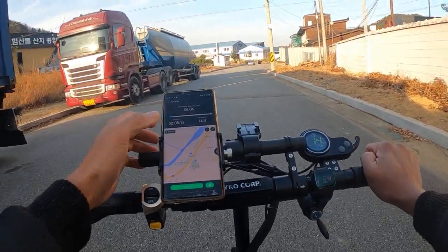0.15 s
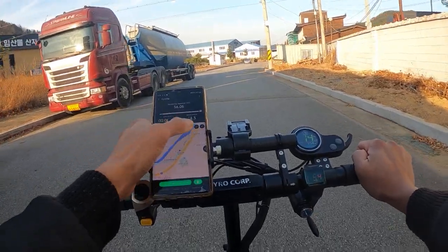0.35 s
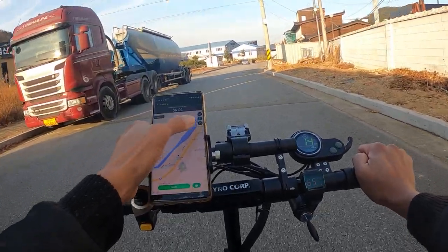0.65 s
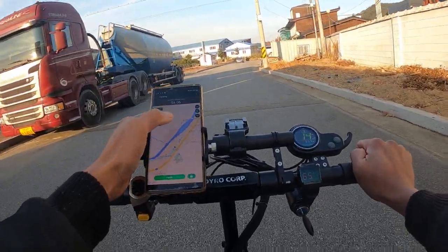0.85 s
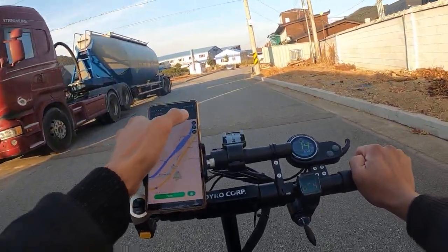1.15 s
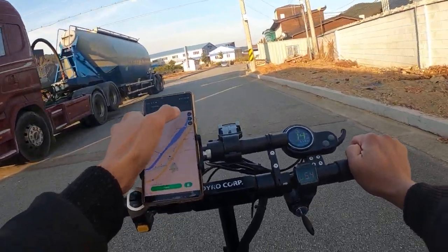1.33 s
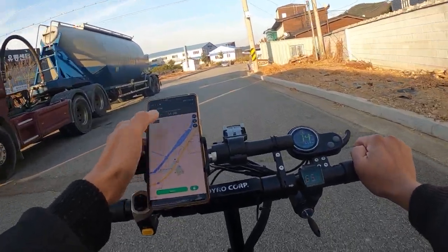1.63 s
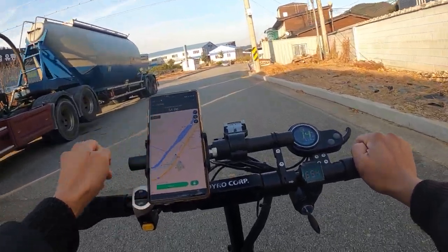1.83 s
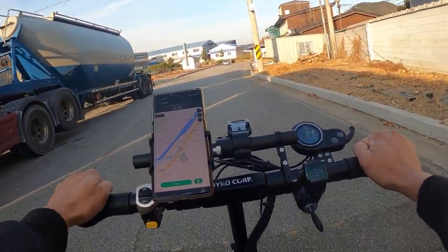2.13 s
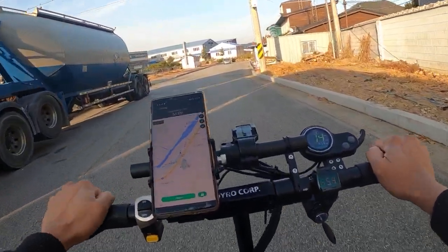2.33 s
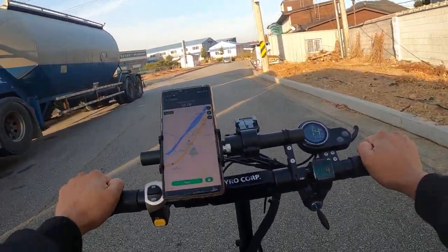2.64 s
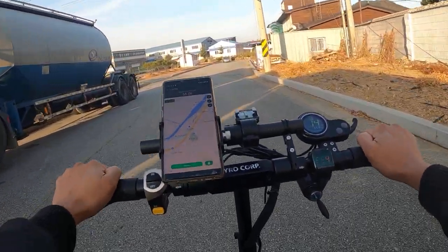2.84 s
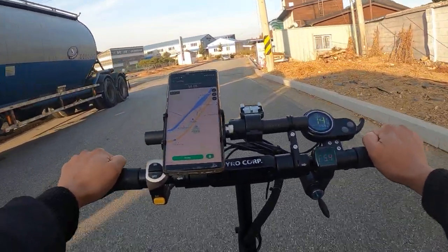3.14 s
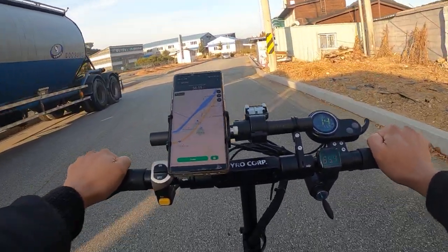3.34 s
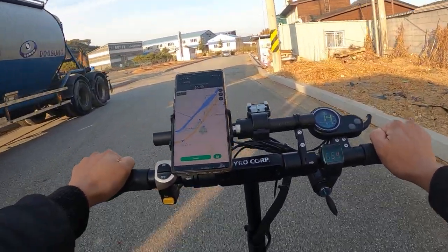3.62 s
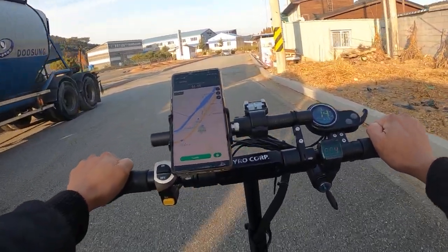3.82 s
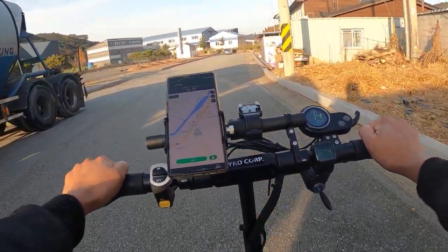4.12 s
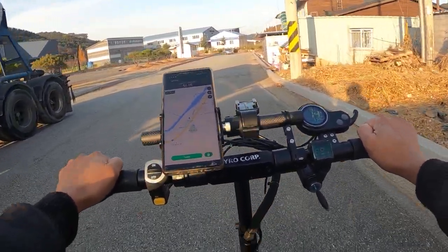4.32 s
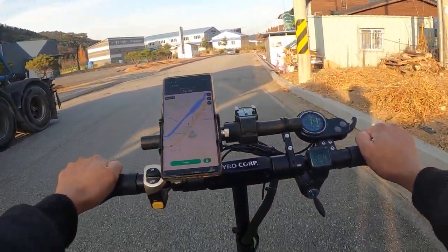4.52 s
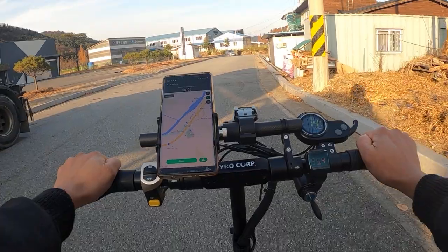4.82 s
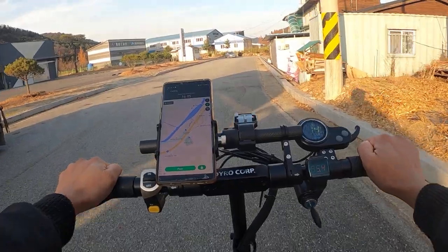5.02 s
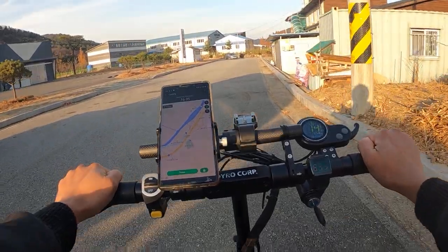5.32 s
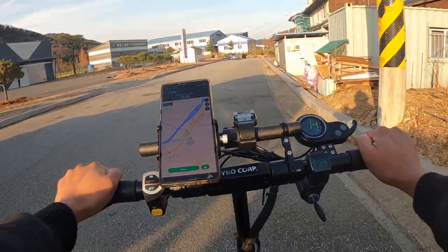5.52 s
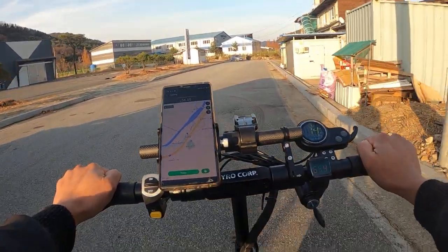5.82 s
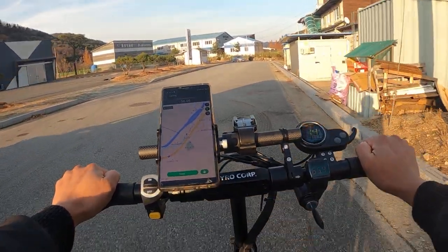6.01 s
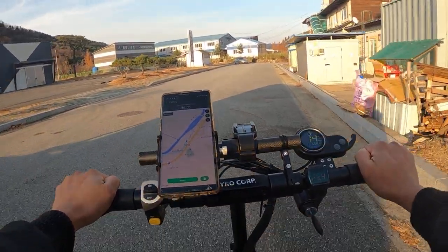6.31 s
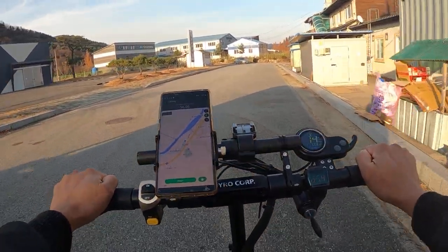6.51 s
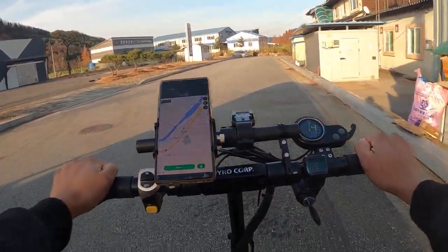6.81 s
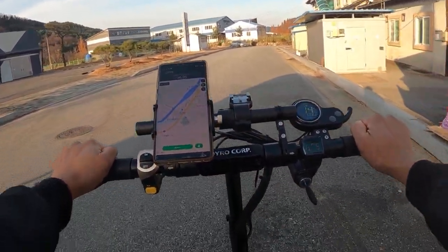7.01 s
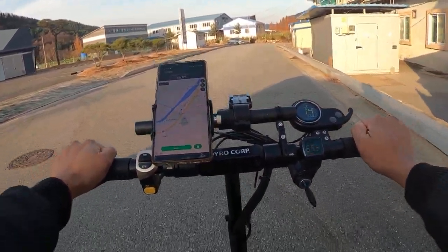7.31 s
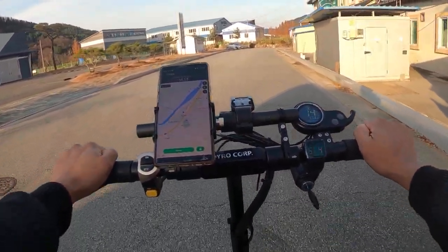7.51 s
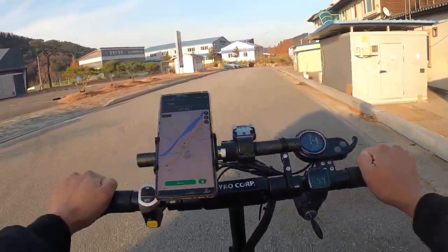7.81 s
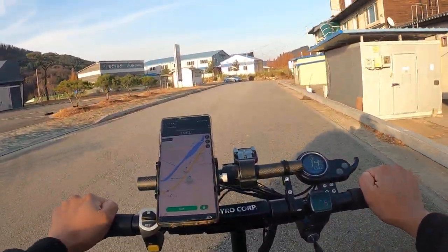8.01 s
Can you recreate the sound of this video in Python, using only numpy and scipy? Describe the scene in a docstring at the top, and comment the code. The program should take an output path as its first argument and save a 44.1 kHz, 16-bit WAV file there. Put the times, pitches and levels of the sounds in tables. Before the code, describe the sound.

Riding an electric scooter outdoors: low two-note motor hum-whine, rolling tyre noise, loose fittings ticking, one sharp rattling jolt, then dull thumps on the microphone.

```python
"""The hub motor of an electric scooter whines on two close notes, as heard from the rider's chest.
The tyres roar and hiss on asphalt (filtered noise), and loose fittings tick (chatter ringing the bar).
A rough patch makes the frame clatter and knock (struck modes, noise) and a dry joint squeak (harmonics).
Wind rumbles; bumps and buffets thump on the microphone and knock in the steering stem."""
import sys
import numpy as np
from scipy import signal
from scipy.io import wavfile

SR = 44100
rng = np.random.default_rng(int(sys.argv[2]) if len(sys.argv) > 2 else 0)


def wrap_up_sound(samples):
    """Save the sound to the file named by the first command line argument, as 16-bit audio."""
    columns = np.atleast_2d(samples).T
    # keep every value between -1 and 1, then stretch to whole-number steps
    tamed = np.clip(columns, -1, 1)
    steps = np.round(tamed * 32767).astype(np.int16)
    wavfile.write(sys.argv[1], SR, steps)


N = 359415
TIME = np.arange(N) / SR

# Motor speed, wavering as bumps check the wheel and it recovers.
# Each row: time in seconds, electrical rate in Hz.
MOTOR_SPEED = [(0, 74.8), (.2, 74.5), (.45, 75.2), (.74, 74.2), (.88, 75.7), (1.08, 74.5), (1.36, 75.5),
               (1.6, 74.5), (1.86, 75.5), (2.28, 74.7), (2.38, 74), (2.6, 74.6), (2.8, 73), (3.0, 73.4),
               (3.13, 74.3), (3.38, 73.9), (3.75, 74), (4.06, 74.8), (4.22, 73.8), (4.44, 75.5),
               (4.61, 73.8), (4.86, 75.5), (5.01, 74.4), (5.4, 75), (5.5, 75.9), (5.75, 75.1), (5.92, 75.9),
               (6.25, 75.5), (6.65, 76.7), (7.02, 77), (7.27, 76.3), (7.38, 75.1), (7.55, 77.2),
               (7.8, 76.3), (8.15, 76)]
SPEED_WOBBLE_HZ, WOBBLE_RATE_HZ = 0.08, 8
# Whine strength. Each row: time in seconds, fifth order in relative dB, sixth order in relative dB.
WHINE_LEVELS = [(0, -38.5, -41.5), (.8, -38.5, -45.5), (1.3, -40, -46), (2.3, -37, -41.5),
                (2.48, -37.5, -43.5), (2.66, -41, -33.5), (2.82, -35, -39), (3.1, -32, -43.5),
                (3.55, -33.5, -35.5), (4.4, -38.5, -45), (4.7, -38.5, -42), (5.3, -39, -42.5),
                (6.3, -38, -48), (7.05, -47, -45), (7.38, -33.5, -36.5), (7.55, -38, -44.5),
                (8.15, -40, -39.5)]
# Faint overtones of the whine. Each row: order, level in dB relative to the fifth-order curve.
WHINE_OVERTONES = [(9, -23), (12, -29), (14, -24.5), (25, -37.5)]

# Road coarseness, as tyre noise. Each row: time in seconds, level in dB.
ROAD_COARSENESS = [(0.0, -47), (0.34, -46), (0.95, -48.5), (2.38, -48.5), (2.72, -37), (2.87, -42),
                   (4.58, -48.5), (6.86, -48), (7.6, -43.5), (8.15, -42.5)]
# Tyre roar spectrum. Each row: frequency in Hz, relative band level in dB.
ROAR_SPECTRUM = [(150, -11.5), (250, 5), (420, -4.5), (600, -9.5), (1000, -7), (1400, -19), (1900, -10),
                 (2500, -20), (3200, -30.5), (5000, -44)]
# Tread hiss spectrum. Each row: frequency in Hz, relative band level in dB.
HISS_SPECTRUM = [(2000, -4.5), (3500, 11.5), (5500, -5), (7500, -0.5), (10000, -15.5), (12000, -25),
                 (15500, -35)]
# Hollow resonances of tyre and deck. Each row: centre in Hz, width in Hz, relative level in dB.
HOLLOW_RESONANCES = [(358.2, 31, 2), (502.3, 54, 0), (720, 109, -8), (1007, 238, -6), (1610, 150, -14),
                     (2060, 450, -24.5), (3280, 970, -29.5)]
ROAR_DB, HOLLOWS_DB, HISS_DB = 3.5, 0, -20.5  # relative to the road level
TYRE_EDGE_HZ = 2250
GRIT_DB, GRIT_S, GRIT_HALF_S = -49, 2.645, 0.086  # loose grit hissing on the rough patch

# Airflow. Each row: time in seconds, rumble in relative dB.
AIRFLOW = [(0, -38), (1.5, -43.5), (2.4, -38.5), (3.45, -39), (5.1, -38), (6.3, -45.5), (7.1, -37),
           (8.15, -33)]
# Wind rumble spectrum. Each row: frequency in Hz, relative band level in dB.
RUMBLE_SPECTRUM = [(15, 1), (40, -0.5), (80, -6), (150, -10), (250, -19), (400, -33.5)]

# Ticks of loose fittings. Each row: snap time in seconds, relative level in dB, upper edge in Hz.
FITTING_TICKS = [(0.018, -34.5, 17000), (0.055, -44, 6000), (0.078, -33, 17000), (0.157, -32.5, 17000),
                 (0.3006, -31.5, 17000), (0.3564, -38.5, 15000), (0.439, -30, 16000), (0.488, -42, 7000),
                 (0.501, -46, 9000), (0.527, -47, 7000), (0.5837, -22, 17000), (0.822, -45, 8050),
                 (0.941, -38.5, 12000), (0.993, -44, 15100), (1.324, -41, 17000), (1.3493, -47, 13000),
                 (1.389, -43, 13100), (1.8136, -43, 6500), (1.857, -38.5, 10000), (1.913, -25, 17000),
                 (1.997, -44, 7000), (2.046, -30, 14000), (2.305, -44, 7000), (2.3857, -27.5, 13000),
                 (2.4098, -29.5, 13000), (4.171, -32.5, 8400), (4.444, -46.5, 11000), (5.1936, -49, 5030),
                 (5.445, -48.5, 7000), (5.672, -48, 8050), (6.8775, -49, 8000), (6.975, -38, 9000),
                 (7.1286, -36.5, 9000), (7.2437, -37.5, 8000), (7.413, -38, 7500), (7.461, -32.5, 8400),
                 (7.953, -33.5, 7000), (7.988, -42, 8000), (8.0228, -44, 8000)]
SLIDE_LEAD_S, SLIDE_DB = 0.013, -14.5  # slide before the snap
SETTLE_DELAY_S, SETTLE_DB = 0.02, -13.5  # second chatter after the snap
BUZZ_DECAY_S, BUZZ_DB = 0.048, -9.5  # faint dying buzz
SNAP_CRACK_DB = -8  # bare crack added to the bar's sound
FAINT_TICKS_PER_S, FAINT_TICK_DB, FAINT_SPREAD_DB = 1.2, -56, 3
SOFT_EDGE_HZ, SOFT_EDGE_AT_DB, EDGE_DB_PER_OCTAVE = 5600, -40, 26.5  # softer contacts are duller
# Modes of the handlebar and its fittings. Each row: frequency in Hz, relative level in dB.
BAR_MODES = [(1200, -2), (1700, -3.5), (2820, 4), (3310, 5.5), (3700, 6), (3920, 4), (4370, -15.5),
             (4750, -11), (5110, 0), (5400, -7), (5770, -7), (6230, -0.5), (6780, -18.5), (7660, -13.5),
             (8130, -0.5), (9050, -2.5), (10100, -9.5), (11000, -19), (12400, -12)]
BAR_T60_S, BAR_STEP_SAMPLES = 0.017, 9

# Low thumps on the microphone. Each row: time in seconds, relative level in dB, half length in
# seconds, upper edge of the flutter in Hz, boom of the mount in dB relative to the flutter.
MIC_THUMPS = [(0.108, -26.5, 0.0089, 200, 2), (0.711, -22.5, 0.019, 232, -2),
              (0.825, -23.5, 0.016, 109, -12), (0.972, -17, 0.013, 172, 5.5),
              (1.235, -28.5, 0.0062, 70, -25), (1.772, -25.5, 0.018, 99, -25),
              (2.677, -13, 0.042, 190, -12), (2.755, -21.5, 0.015, 280, -8), (2.81, -13.5, 0.0053, 276, -6),
              (2.959, -16.5, 0.0058, 297, 2.5), (3.055, -20.5, 0.027, 110, -21), (3.7, -24, 0.058, 99, -13),
              (3.865, -17, 0.01, 62, -25), (4.102, -12, 0.012, 100, -9.5), (4.32, -20.5, 0.015, 89, -19),
              (4.503, -17, 0.016, 87, -30), (4.636, -12.5, 0.019, 116, -16), (4.764, -19, 0.0067, 137, -17),
              (4.924, -13, 0.017, 133, -3), (5.373, -17, 0.031, 144, -6.5), (5.442, -16, 0.011, 160, 0),
              (5.521, -18, 0.0085, 136, -17), (5.893, -15.5, 0.017, 144, -9.5),
              (6.023, -13.5, 0.012, 134, -5), (6.069, -17, 0.005, 162, -8), (6.679, -26.5, 0.041, 86, -7),
              (6.986, -11, 0.0071, 149, -10), (7.294, -15.5, 0.011, 111, -10), (7.364, -21, 0.027, 170, -9),
              (7.69, -24.5, 0.036, 140, -11), (7.773, -15.5, 0.02, 137, -14.5),
              (7.832, -18, 0.0097, 187, -6), (8.085, -13.5, 0.028, 141, -12.5)]
# The mount's boom band: lower and upper edge in Hz.
MOUNT_BAND_HZ = [125, 206]
REBOUND_DELAY_S, REBOUND_DB, REBOUND_STRETCH = 0.033, -9.5, 2.42
SMALL_THUMPS_PER_S, SMALL_THUMP_DB = 2.5, 7  # dB relative to the airflow curve
SMALL_THUMP_HALF_S, SMALL_THUMP_EDGE_HZ = 0.0089, 91

# Hard bumps. Each row: time in seconds, strength in relative dB.
STEM_BUMPS = [(0.104, -32), (0.693, -21), (0.96, -17), (2.628, -17), (2.801, -15), (2.96, -13), (4.095, -7),
              (4.643, -16), (4.933, -21.5), (5.438, -16), (6.98, -19), (7.295, -7), (7.828, -22)]
# Modes of the steering stem. Each row: frequency in Hz, relative level in dB, t60 in seconds.
STEERING_STEM_MODES = [(139, -3, 0.026), (295.4, -0.5, 0.033), (389, -3.5, 0.03), (636, -14, 0.022)]

# Frame knocks. Each row: time in seconds, bright ring of the bar in relative dB,
# dull clack of the deck in relative dB.
FRAME_KNOCKS = [(2.393, -50, -21), (2.4784, -22, -27), (2.497, -36, -44), (2.528, -34, -24),
                (2.552, -33, -21.5), (2.57, -26, -29), (2.5755, -30, -38), (2.5927, -15.5, -17),
                (2.6125, -28, -32), (2.6295, -18, -24), (2.6358, -15, -20), (2.648, -38, -21),
                (2.661, -20, -27), (2.673, -30, -32), (2.6801, -39, -26), (2.693, -26, -34),
                (2.696, -33, -19.5), (2.711, -18, -28), (2.7708, -10.5, -22), (2.778, -19, -28),
                (2.787, -23, -33.5), (2.808, -29, -16), (2.845, -20.5, -41), (2.9235, -15, -17),
                (2.927, -30, -16.5), (2.949, -27, -21), (2.9615, -20.5, -19), (2.9934, -26, -31),
                (3.0307, -24.5, -31), (6.271, -47, -25.5), (6.3619, -33, -37)]
# Clatter spectrum of deck and mudguard. Each row: frequency in Hz, relative band level in dB.
CLATTER_SPECTRUM = [(200, 7.5), (320, 4), (500, -1.5), (640, -7.5), (950, 13.5), (1500, -15), (2400, -26.5),
                    (3700, -36), (5200, -29.5), (9000, -49.5), (15000, -66.5)]
# Jolts on the rough patch. Each row: time in seconds, clatter in relative dB, rise in seconds,
# fall in seconds.
ROUGH_JOLTS = [(2.42, -45.5, 0.025, 0.017), (2.655, -34, 0.048, 0.071), (2.804, -35.5, 0.019, 0.0089),
               (2.93, -34.5, 0.019, 0.046)]
# Modes of deck and mudguard. Each row: frequency in Hz, relative level in dB, t60 in seconds.
DECK_MODES = [(520, -2, .04), (950, -1, .028), (1450, -6, .01), (1950, -8, .013), (2830, -3, .02),
              (3470, -1, .012), (3950, -5, .014), (4280, -9, .018), (6200, -12, .004)]
DECK_RING_DB, RATTLE_DB = -22, -7
RATTLES_PER_S, RATTLE_SPREAD_DB = 260, 6.5

# Squeaks of a dry joint. Each row: time in seconds, fundamental level in dB, half length in seconds,
# pitch in Hz, glide as a share of pitch per half length, slope in dB per harmonic.
JOINT_SQUEAKS = [(2.7432, -20.5, 0.0037, 965, 0.0034, -3), (2.8103, -14, 0.0015, 3330, -0.014, -24),
                 (2.816, -24, 0.001, 3080, 0.02, -21), (2.809, -38.5, 0.01, 3310, -0.004, -4.5)]

CUTOFF_HZ = 15800


def from_db(db):
    """Decibels to gain."""
    return 10 ** (np.asarray(db) / 20)


def rms_one(x):
    """Scale to unit rms."""
    return x / np.sqrt(np.mean(x ** 2) + 1e-20)


def in_time(rows):
    """Interpolate each column of a curve at every sample."""
    s, *columns = np.transpose(rows)
    return [np.interp(TIME, s, column) for column in columns]


def butter(x, edge_hz, kind, order=2):
    """Causal Butterworth filter."""
    edge_hz = np.clip(edge_hz, 10, 0.45 * SR)
    sos = signal.butter(order, edge_hz, kind, fs=SR, output="sos")
    return signal.sosfilt(sos, x + 1e-18)


def noise_band(low_hz, high_hz):
    """Band of noise at unit rms."""
    return rms_one(butter(rng.standard_normal(N), [low_hz, high_hz], "band"))


def drift(rate_hz):
    """Smooth random wander of spread 1: two-pole filtered noise, one value per 40 samples."""
    r = np.exp(-80 * np.pi * rate_hz / SR)
    noise = rng.standard_normal(N // 40 + 2002)
    slow = signal.lfilter([1], [1, -2 * r, r * r], noise)[2000:]
    return np.interp(np.arange(N) / 40, np.arange(len(slow)), rms_one(slow))


def bell(s, half_s):
    """Gaussian swell around time s."""
    return np.exp(-0.5 * np.minimum(((TIME - s) / half_s) ** 2, 100))


def coloured(spectrum, patchy_db, grain_db=0):
    """Noise in half-octave bands, each flickering on its own; uneven grain crackles; rms 1."""
    hz, level_db = np.transpose(spectrum)
    edges_hz = 15 * 2 ** np.arange(0, 10.1, 0.5)
    grain = from_db(grain_db * np.minimum(drift(170), 2))
    white = rng.standard_normal((2, N)) * grain
    out = 0
    for k, (low, high) in enumerate(zip(edges_hz, edges_hz[1:])):
        log_centre = np.log(low * high) / 2
        band_db = np.interp(log_centre, np.log(hz), level_db, left=-np.inf, right=-np.inf)
        if np.isfinite(band_db):
            band = butter(white[k % 2], [low, high], "band")  # neighbours use separate noises
            out = out + from_db(band_db + patchy_db * drift(18)) * band
    return rms_one(out)


def at_random(per_s):
    """Event times scattered evenly over the ride."""
    return rng.uniform(0, TIME[-1] - 0.25, 100)[:round(per_s * N / SR)]


def ring(force, hz, t60_s):
    """A mode: a unit click leaves a sine decaying from height 1."""
    r = from_db(-60 / (t60_s * SR))
    w = 2 * np.pi * hz / SR
    return signal.lfilter([0, np.sin(w)], [1, -2 * r * np.cos(w), r * r], force + 1e-18)


def ring_modes(force, modes):
    """Sum of modes struck together, with alternating sign."""
    return sum((-1) ** k * from_db(db) * ring(force, hz, t60_s)
               for k, (hz, db, t60_s) in enumerate(modes))


def contacts(rows, decay_s, rise_s=0.0018):
    """Each contact is a short, dying chatter of tiny impacts of very uneven size."""
    age_s = np.arange(SR // 5) / SR
    shape = (1 - np.exp(-(age_s / rise_s) ** 2)) * np.exp(-age_s / decay_s)
    force = np.zeros(N + len(age_s))
    draws = rng.standard_normal((len(rows), 2, len(age_s)))
    for (s, level_db, edge_hz), (chatter, size) in zip(rows, draws):
        burst = chatter * from_db(5 * size) * shape
        burst = butter(burst / np.linalg.norm(burst), edge_hz, "low")
        force[max(round(s * SR), 0):][:len(age_s)] += from_db(level_db) * burst
    return force[:N]


def by_force(s, level_db):
    """Contact rows whose upper edge rises with strength."""
    edge_hz = SOFT_EDGE_HZ * 2 ** ((level_db - SOFT_EDGE_AT_DB) / EDGE_DB_PER_OCTAVE)
    return np.c_[s, level_db, edge_hz]


def handlebar(force, top_hz, ring_db=-21):
    """Well damped bar modes, reached one after another, plus the contact's broad crack."""
    rings = np.zeros(N)
    for k, (hz, db) in enumerate(BAR_MODES):
        delayed = np.pad(force, (BAR_STEP_SAMPLES * k, 0))[:N]
        rings += from_db(db) * ring(delayed, hz, BAR_T60_S)
    crack = butter(force, [900, 6500], "band", order=1)
    return butter(from_db(ring_db) * rings + from_db(8) * crack, top_hz, "low", order=3)


def motor():
    """Torque ripple sings at five and six times the electrical rate; the road shakes each line."""
    rate_hz, = in_time(MOTOR_SPEED)
    fifth_db, sixth_db = in_time(WHINE_LEVELS)
    wobble_hz = SPEED_WOBBLE_HZ * drift(WOBBLE_RATE_HZ)
    angle = 2 * np.pi * np.cumsum(rate_hz + wobble_hz) / SR

    def line(order, flutter):
        in_phase = (1 + flutter * drift(18)) * np.sin(order * angle)
        return in_phase + flutter * drift(24) * np.cos(order * angle)

    fifth = from_db(fifth_db + 4.0) * line(order=5, flutter=0.22)
    seventh = from_db(-15.5) * line(order=7, flutter=0.24)  # follows the sixth-order level
    sixth_gain = from_db(sixth_db + 4.5 + 0.37 * drift(5))
    sixth = sixth_gain * (line(order=6, flutter=0.26) + seventh)
    # the fundamental swells as the motor pulls after the bump
    hum = from_db(-33.5) * bell(3.275, 0.15) * line(order=1, flutter=0.15)
    overtones = sum(from_db(fifth_db + 1.0 + db) * line(order, flutter=0.68)
                    for order, db in WHINE_OVERTONES)
    return fifth + sixth + hum + overtones


def tyres():
    """Asphalt grain drives a broad roar, the hollows of tyre and deck, and a fine hiss."""
    road_db, = in_time(ROAD_COARSENESS)
    hollows = sum(from_db(db) * noise_band(hz - width_hz / 2, hz + width_hz / 2)
                  for hz, width_hz, db in HOLLOW_RESONANCES)
    roar = butter(coloured(ROAR_SPECTRUM, patchy_db=2.0), TYRE_EDGE_HZ, "low", order=8)
    low = from_db(ROAR_DB) * roar + from_db(HOLLOWS_DB) * hollows
    grit_gain = from_db(GRIT_DB) * bell(GRIT_S, GRIT_HALF_S)
    hiss_gain = from_db(road_db + HISS_DB) + grit_gain
    return from_db(road_db) * low + hiss_gain * coloured(HISS_SPECTRUM, patchy_db=2.0)


def wind():
    """A lumpy rumble of air on the microphone: low noise of wandering level."""
    air_db, = in_time(AIRFLOW)
    gain = from_db(air_db + 2.0 + 1.3 * drift(11.0))
    return gain * coloured(RUMBLE_SPECTRUM, patchy_db=1.0)


def ticks():
    """A loose fitting slides, snaps on the bar and settles in softer chatter; faint ones at random."""
    s, level_db, edge_hz = np.transpose(FITTING_TICKS)
    slide_rows = np.c_[s - SLIDE_LEAD_S, level_db + SLIDE_DB, edge_hz]
    slide = contacts(slide_rows, decay_s=0.02, rise_s=0.022)
    snap = contacts(FITTING_TICKS, decay_s=0.002, rise_s=0.0012)
    settle_rows = np.c_[s + SETTLE_DELAY_S, level_db + SETTLE_DB, edge_hz]
    settle = contacts(settle_rows, decay_s=0.005, rise_s=0.0026)
    buzz = contacts(np.c_[s, level_db + BUZZ_DB, edge_hz], decay_s=BUZZ_DECAY_S)

    faint_s = at_random(FAINT_TICKS_PER_S)
    faint_db = rng.normal(FAINT_TICK_DB, FAINT_SPREAD_DB, len(faint_s))
    faint = contacts(by_force(faint_s, faint_db), decay_s=0.0028)

    soft = butter(slide + settle + buzz, 2800, "high", order=1)
    bar = handlebar(snap + faint + soft, top_hz=9500, ring_db=-22)
    crack = from_db(SNAP_CRACK_DB) * butter(snap, [1000, 11000], "band")
    low_body = from_db(23.5) * butter(snap, [950, 1900], "band")
    high_body = from_db(-6.5) * butter(snap, [3400, 6500], "band")
    return from_db(8.0) * (bar + crack) + low_body + high_body


def thump(level_db, half_s, top_hz, boom_db):
    """A slow pressure push with low flutter and the mount's boom, centred in half a second."""
    t = np.arange(-SR // 4, SR // 4) / SR
    swell = np.exp(-0.5 * (t / half_s) ** 2)
    flutter = butter(rng.standard_normal(len(t)), top_hz, "low", order=3)
    flutter = butter(flutter, top_hz * 0.22, "high", order=1) * swell
    boom = butter(rng.standard_normal(len(t)), MOUNT_BAND_HZ, "band") * swell
    noise = rms_one(flutter) + from_db(boom_db) * rms_one(boom)
    squared = (t / (0.44 * half_s)) ** 2
    push = (1 - squared) * np.exp(-0.5 * squared)
    push *= min(1.1, 110 / top_hz)  # dull thumps are mostly push
    return from_db(level_db - 4.0) * (noise * np.sqrt(np.mean(swell ** 2)) + push)


def thumps():
    """Bumps and buffets shake the microphone and rebound duller; random small ones follow the air."""
    rebounds = [(s + REBOUND_DELAY_S, db + REBOUND_DB, half_s * REBOUND_STRETCH, hz * 0.74, -np.inf)
                for s, db, half_s, hz, _ in MIC_THUMPS]
    small = []
    for s in at_random(SMALL_THUMPS_PER_S):
        level_db = np.interp(s, *np.transpose(AIRFLOW)) + SMALL_THUMP_DB
        small.append((s, level_db, SMALL_THUMP_HALF_S, SMALL_THUMP_EDGE_HZ, -np.inf))
    out = np.zeros(N + SR)
    for s, *shape in list(MIC_THUMPS) + rebounds + small:
        sound = thump(*shape)
        out[round(s * SR):][:len(sound)] += sound
    return out[SR // 4:][:N]  # thump centres land on their times


def stem():
    """A hard bump sends one firm knock up the steering stem: a click rings its modes."""
    force = np.zeros(N)
    for s, db in STEM_BUMPS:
        force[round(s * SR)] = from_db(db)
    return ring_modes(force, STEERING_STEM_MODES)


def shaking():
    """Each jolt builds up and dies away exponentially."""
    gain = np.zeros(N)
    for s, db, rise_s, fall_s in ROUGH_JOLTS:
        distance = np.maximum((s - TIME) / rise_s, (TIME - s) / fall_s)
        gain += from_db(db) * np.exp(-np.minimum(distance, 40))
    return gain


def rattle():
    """Separate small impacts of uneven size set deck and mudguard ringing; rms 1."""
    struck = rng.random(N) < RATTLES_PER_S / SR
    sizes = from_db(RATTLE_SPREAD_DB * np.minimum(rng.standard_normal(N), 1.8))
    signs = rng.choice([-1, 1], N)
    return rms_one(ring_modes(struck * sizes * signs, DECK_MODES))


def frame():
    """Bar and deck knock over bumps; on the rough patch deck and mudguard rattle and boom."""
    crackle = from_db(-3.0) * coloured(CLATTER_SPECTRUM, patchy_db=1.5, grain_db=6.5)
    boom = from_db(0.5) * noise_band(470, 550)  # hollow deck
    clatter = from_db(5.0) * shaking() * (crackle + boom + from_db(RATTLE_DB) * rattle())

    s, bar_db, deck_db = np.transpose(FRAME_KNOCKS)
    blows = contacts(by_force(s, bar_db), decay_s=0.0015, rise_s=0.0008)
    dull_bar = from_db(-0.5) * handlebar(blows, top_hz=4400)
    bright_bar = from_db(-9.0) * handlebar(blows, top_hz=9900)

    clacks = contacts(by_force(s, deck_db), decay_s=0.0045)
    deck = from_db(21.0) * butter(clacks, [650, 1900], "band")
    deck_ring = from_db(DECK_RING_DB) * ring_modes(clacks, DECK_MODES)
    return clatter + dull_bar + bright_bar + deck + deck_ring


def squeaks(count=10):
    """A dry joint sticks and slips for milliseconds: a short gliding stack of harmonics."""
    out = np.zeros(N)
    for s, level_db, half_s, pitch_hz, glide, slope_db in JOINT_SQUEAKS:
        bend = glide * np.clip((TIME - s) / half_s, -1, 1)
        hz = pitch_hz * (1 + bend + 0.012 * drift(250))
        phase = 2 * np.pi * np.cumsum(hz) / SR
        swell = bell(s, half_s) * from_db(1.5 * drift(200))
        for k in range(min(count, int(9800 / pitch_hz))):
            partial_db = level_db + k * slope_db - 14.4 * (k > 3)  # extra cut above the fourth
            out += from_db(partial_db) * swell * np.sin((k + 1) * phase)
    return out


def scene():
    """All sources ride with the microphone in open air; its port's cover dulls wind and thumps."""
    covered = butter(wind() + thumps(), 495, "low", order=4)
    mix = motor() + tyres() + covered + ticks() + stem() + frame() + squeaks()
    return mix[None]


def record(dry):
    """Cut the top steeply with an elliptic low-pass."""
    sos = signal.ellip(10, 0.1, 90, CUTOFF_HZ, fs=SR, output="sos")
    return signal.sosfilt(sos, dry)


dry = scene()
out = record(dry)
wrap_up_sound(out)
```